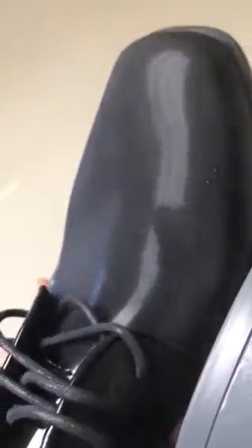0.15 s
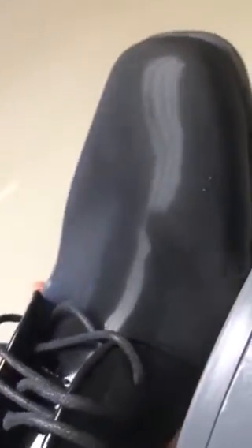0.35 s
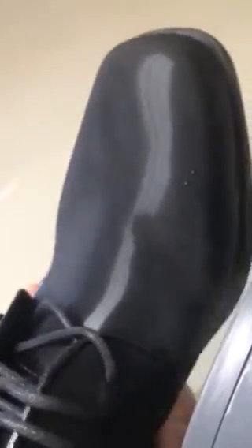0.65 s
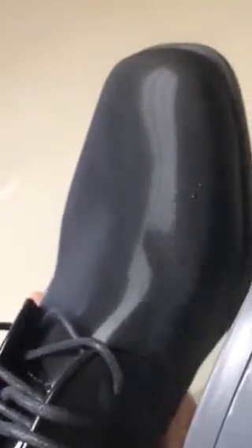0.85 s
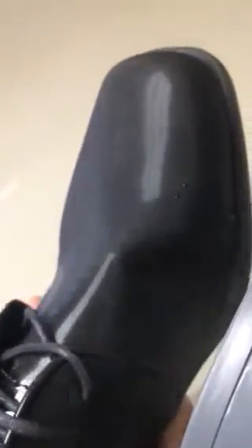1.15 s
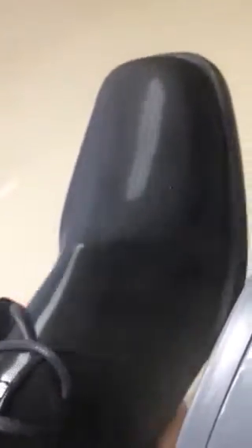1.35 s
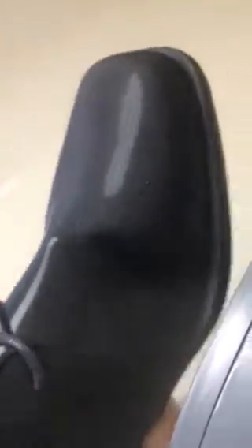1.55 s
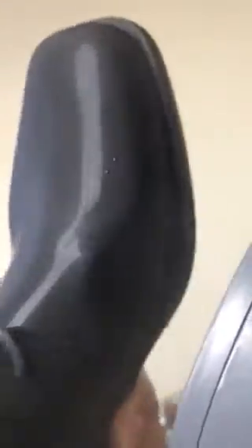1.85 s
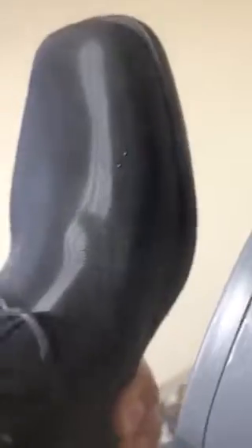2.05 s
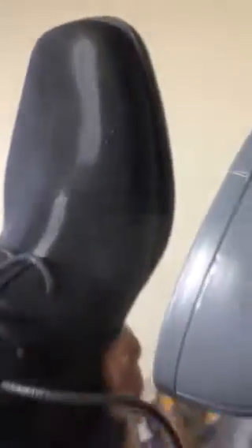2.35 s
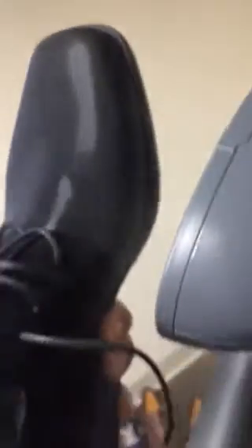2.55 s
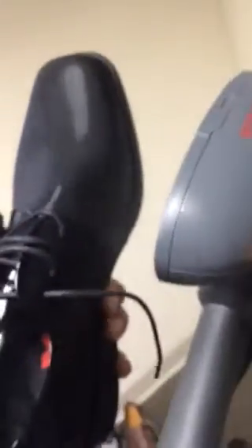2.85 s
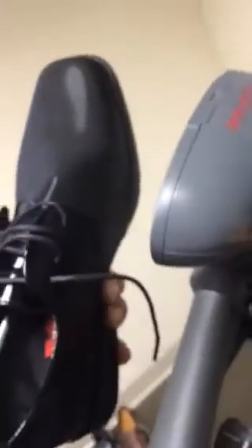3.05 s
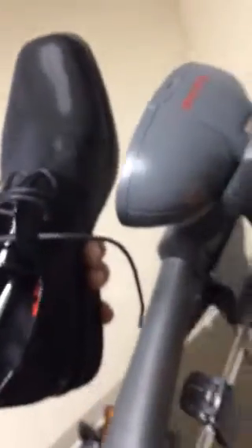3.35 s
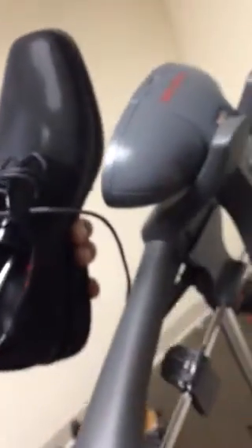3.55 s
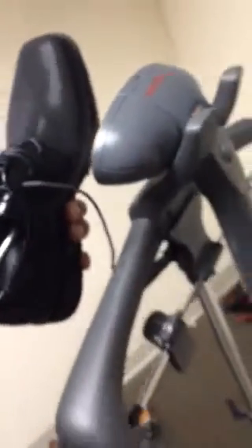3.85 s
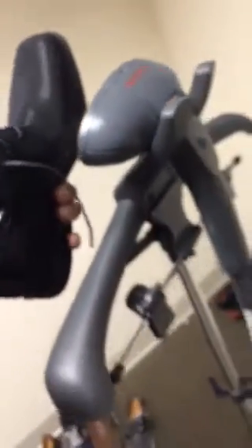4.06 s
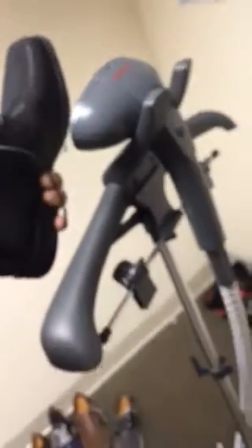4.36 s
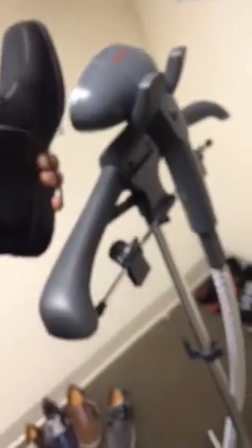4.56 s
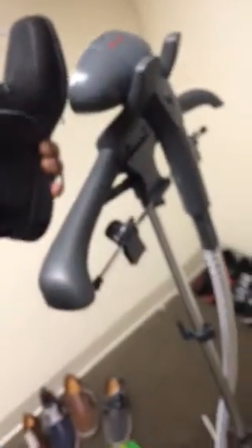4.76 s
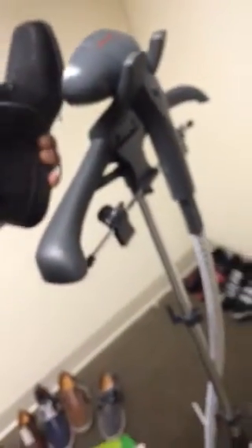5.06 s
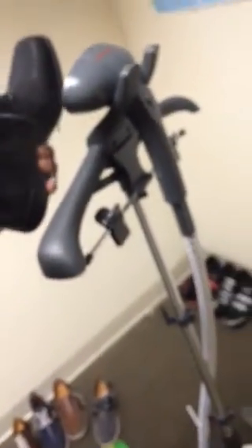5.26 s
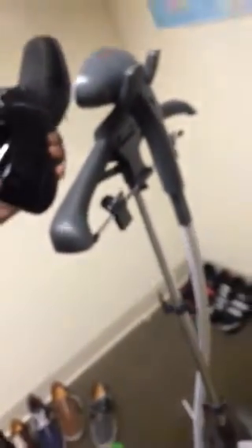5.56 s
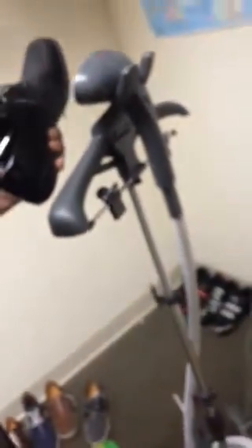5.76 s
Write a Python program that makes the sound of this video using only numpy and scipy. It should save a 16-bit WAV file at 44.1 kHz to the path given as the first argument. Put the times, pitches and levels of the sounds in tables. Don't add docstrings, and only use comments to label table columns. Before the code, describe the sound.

Close up, a garment steamer blows a continuous, bright, breathy hiss at a shoe, with frequent short hollow water spits. From about two seconds the phone microphone backs away; the hiss changes colour and weakens, the spits grow rare, and the flow surges briefly three times. A wet hose gurgles softly and a faint low motor drone sits beneath, in a carpeted room.

```python
import sys
import numpy as np
from scipy import signal
from scipy.fft import rfft, irfft
from scipy.io import wavfile
from scipy.ndimage import uniform_filter1d, map_coordinates

SR = 44100
rng = np.random.default_rng(int(sys.argv[2]) if len(sys.argv) > 2 else 0)


def store_pcm(level_fs):
    pcm = np.round(np.clip(level_fs, -1, 1) * 32767).astype(np.int16)
    wavfile.write(sys.argv[1], SR, np.atleast_2d(pcm).T)


def boost_factor(decibels):
    exponent = np.asarray(decibels, float) / 20
    return 10 ** exponent


N = 261072
T = np.arange(N) / SR
FRAME = 512


def unit(x):
    return x / np.sqrt(np.mean(x ** 2) + 1e-20)


def along(points, hz):
    f, v = np.transpose(points)
    return np.interp(np.log(hz + 1), np.log(f + 1), v)


def curves(rows, t):
    s, *cols = np.transpose(rows)
    return [np.interp(t, s, c) for c in cols]


def wobble(rate):
    coarse = T[::32]
    knots = rng.standard_normal(int(N * rate / SR) + 4)
    return np.interp(T, coarse, map_coordinates(knots, [coarse * rate]))


def peak(hz, centre_hz, width_hz):
    return 1 / np.sqrt(1 + (2 * (hz - centre_hz) / width_hz) ** 2)


def smoothed(cells, bands, frames):
    return uniform_filter1d(uniform_filter1d(cells, size=bands, axis=0), size=frames, axis=1)


def rush(colour, patchy_db):
    hz, t, z = signal.stft(rng.standard_normal(N), SR, nperseg=FRAME)
    gain = colour(hz[:, None], t) + 0 * t
    gain = gain / np.sqrt(np.mean(gain ** 2, axis=0))
    patches = unit(smoothed(rng.standard_normal(z.shape), bands=5, frames=24))
    z = z * gain * boost_factor(patchy_db * patches)
    return unit(signal.istft(z, SR, nperseg=FRAME)[1][:N])


# time in seconds, loss with distance in dB (positive is nearer), facing the holes in dB.
PHONE = [(0, 1, -4), (.2, 0, -2.5), (.56, 1, 2.5), (.94, -.5, 2), (1.3, 0.5, 0.5), (1.65, 0, 3),
         (1.83, -1, -0.5), (2.05, 1, -2.5), (2.26, -.5, -2.5), (2.5, -1, -1.5), (2.8, -3.5, 3.5),
         (3.3, -5, 4), (3.7, -5, 0.5), (3.82, -4, -6), (4.1, -5.5, -3), (4.72, -7, 0.5), (5.25, -10, -3.5),
         (5.92, -11, -3.5)]
# time in seconds, tightness of the gap in dB, jet let past in dB, echo notch in Hz, notch depth 0-1.
SHOE = [(0, 0.5, 1, 4900, 0.6), (.45, 0, 0, 4860, 0.63), (1, -.5, 0.5, 4600, 0.6), (1.4, -1, 3, 4150, 0.46),
        (1.85, -1, 3, 4220, 0.67), (2.15, -2, 3, 4550, 0.46), (2.45, -3.5, 4.5, 4250, 0.6),
        (2.9, -9.5, 3, 3700, 0.05), (3.2, -6.5, 2.5, 4200, 0.14), (3.4, -3.5, 3.5, 4900, 0.67),
        (3.75, -2.5, 2, 5100, 0.62), (4.1, -4, 0.5, 5060, 0.4), (4.6, -7.5, 0.5, 4860, 0),
        (5.2, -5.5, 2.5, 5000, 0.14), (5.55, -1.5, 1.5, 4970, 0.2), (5.92, -5, 3, 5150, 0.05)]


def steam():
    loss_db, facing_db = curves(PHONE, T)
    closed_db, passed_db, _, _ = curves(SHOE, T)
    flutter = wobble(14)
    head_db = -40 + surge_db() + 0.14 * flutter + 1.04 * wobble(90)
    gap_db = -39 + closed_db + 0.28 * flutter
    jet_db = -42 + passed_db + 0.27 * flutter
    holes_db = -42 + facing_db + 0.9 * wobble(6.2)
    flow = boost_factor(head_db) * rush(head, patchy_db=0.74)
    flow += boost_factor(gap_db) * rush(gap, patchy_db=0.37)
    flow += boost_factor(jet_db) * rush(jet, patchy_db=1.5)
    flow += boost_factor(holes_db) * rush(holes, patchy_db=2.2)
    return boost_factor(loss_db) * flow


# time in seconds, centre in Hz, width in Hz, gain over the broad hump in dB.
MODE = [
    (0, 1560, 407, 0),
    (1.4, 1510, 437, 12),
    (2.1, 1510, 450, -9),
    (2.6, 1400, 462, -4),
    (3.3, 1350, 500, -1),
    (3.8, 1460, 404, 14),
    (4.2, 1750, 200, -1.5),
    (5.1, 1870, 150, 3.5),
    (5.4, 1900, 300, -15),
]


def head(hz, t):
    mode_hz, width_hz, gain_db = curves(MODE, t)
    return boost_factor(gain_db) * peak(hz, mode_hz, width_hz) ** 2 + peak(hz, 1476, 2090) ** 4


def shifted(centre_hz, follows, t):
    return centre_hz + follows * (curves(SHOE, t)[2] - 5000)


# frequency in Hz for an upper edge at 4 kHz, level in dB per Hz.
GAP = [(1500, -17.5), (2000, -2), (2600, -1.5), (3000, -1), (3500, 0.5), (3900, -1.5), (4100, -9),
       (4550, -9.5), (4680, -30)]


def gap(hz, t):
    edge_hz = shifted(4050, 0.19, t)
    overtone = 0.48 * (t > 4.1) * (t < 5.3) * peak(hz, 3600, 140) ** 2
    ridge = 0.5 * np.clip(1 - t / 1.1, 0, 1) * peak(hz, 3600, 600) ** 2
    return boost_factor(along(GAP, hz * 4000 / edge_hz)) * (1 + overtone + ridge)


# frequency in Hz, level in dB per Hz.
JET = [(2500, -28), (4200, -2), (6000, -6), (9000, -5), (12000, -8.5), (12900, -6), (14000, -2.5),
       (15300, -7.5)]


def jet(hz, t):
    shown = np.interp(t, [0, 3.1, 3.4, 4, 4.4, 5.92], [0.1, 0.36, 2.1, 1.8, 0.55, 1.2])
    return boost_factor(along(JET, hz)) * (1 + shown * peak(hz, shifted(7150, 0.9, t), 2100) ** 2)


def holes(hz, t):
    whistle = peak(hz, shifted(11150, 0.39, t), 1680) ** 2
    facing = np.interp(t, [1.1, 1.3, 1.75, 1.9, 2.25, 2.4, 2.55], [0.22, 0.94, 0.73, 0.0, 0.31, 0.97, 0.29])
    return whistle + facing * peak(hz, 12500, 600) ** 2


SURGES = [
    3.74,
    4.98,
    5.46,
]


def surge_db():
    width_s = 0.06
    return 3.5 * sum(np.exp(-((T - s) / width_s) ** 2) for s in SURGES)


def blip(hz, cycles):
    turns = np.arange(SR // 25) / SR * hz
    return np.sin(2 * np.pi * turns) * boost_factor(-60 * (turns - 1 / 4) / max(cycles, 1))


# crest in seconds, crest in dB, ring in Hz, cycles of ring to -60 dB.
SPITS = [(0.0577, -26.5, 1210, 9), (0.2295, -19.5, 1300, 7), (0.3484, -27, 1000, 10),
         (0.4123, -25.5, 1220, 2), (0.6128, -19, 1300, 8), (0.956, -29, 1250, 4), (1.1106, -23, 1100, 7),
         (1.2316, -21, 1300, 4), (1.273, -27, 1160, 12), (1.4447, -25.5, 1050, 13),
         (1.5351, -22.5, 1100, 12), (1.6655, -28, 885, 3), (1.9875, -27, 1000, 5), (1.9985, -27, 1000, 5),
         (2.0237, -25, 1160, 3), (2.232, -22, 1170, 9), (2.535, -21, 1120, 8), (2.6118, -24.5, 780, 6),
         (2.652, -28.5, 1140, 20), (2.9098, -28, 1170, 5), (3.0635, -31, 1050, 5), (3.1032, -30, 1000, 12),
         (3.704, -30, 1220, 4), (0.9978, -27, 1100, 8), (4.553, -39, 710, 2), (3.8968, -30, 1100, 5),
         (3.9885, -32, 970, 9), (4.835, -36, 1220, 3), (5.4686, -36, 935, 10), (5.6756, -38, 1000, 8)]
# crest in seconds, crest in dB,
# ring in Hz, cycles of ring to -60 dB.
GULPS = [
    (.421, -38, 200, 8),
    (0.719, -40, 190, 12),
    (1.982, -41, 200, 4),
    (2.228, -48, 205, 13),
    (3.8785, -36, 550, 1),
    (5.06, -40, 800, 8),
]


def spitting():
    out = np.zeros(N + SR)
    for s, db, hz, cycles in SPITS + GULPS:
        slug = blip(hz, cycles)
        out[round((s - 1 / 4 / hz) * SR):][:len(slug)] += boost_factor(db + 0.3) * slug
    return out[:N]


# frequency in Hz, level in dB per Hz.
GURGLE = [(30, -10), (80, -15), (200, -14.5), (255, -3), (330, -8.5), (500, -1), (800, -4.5), (1100, 6.5),
          (1800, -19)]


def hose():
    patter = np.zeros(N + SR)
    for at, size, tone in rng.random((700, 3)):
        slug = blip(550 * 2.5 ** tone, cycles=6.8)
        patter[int(at * N):][:len(slug)] += boost_factor(-3 * np.log(size + 0.02)) * slug
    rumble = boost_factor(3.1 * wobble(30)) * rush(lambda hz, t: boost_factor(along(GURGLE, hz)), patchy_db=2.0)
    swell_s = 0.15
    wet = np.tanh(sum(np.exp(-((T - s) / swell_s) ** 2) for s, *_ in SPITS) / 2)
    fade_db = 1.12 * curves(PHONE, T)[0]
    level_db = -51.5 + fade_db + 4 * wet + surge_db()
    return boost_factor(level_db) * (unit(rumble) + boost_factor(-5) * unit(patter[:N]))


def walls(x):
    echoes = 0
    for place, sign, drift in rng.random((6, 3)):
        delay_s = 0.002 + 0.014 * place + 0.000128 * (drift - 0.7) * T + 0.00006 * wobble(1.237)
        echoes = echoes + np.sign(sign - 0.5) * map_coordinates(x, [(T - delay_s) * SR], mode="wrap")
    share = boost_factor(-20.5 - 0.68 * curves(PHONE, T)[0])
    return (x + share * echoes) / np.sqrt(1 + 6 * share ** 2)


# time in seconds, notch in Hz, width in Hz, depth 0-1.
HAND = [
    (0, 2360, 200, 0.3),
    (2.3, 2380, 200, 0),
    (3, 2660, 700, 0.34),
    (4.1, 2300, 500, 0.8),
    (4.7, 2830, 600, 0.26),
    (5.5, 2700, 400, .05),
]
# time in seconds, notch in Hz.
TREBLE_NOTCH = [(0, 13400), (.5, 12800), (.9, 12300), (1.65, 13900), (2.15, 11700), (2.3, 13800), (2.9, 12800),
                (3.65, 12900), (4, 13800), (4.25, 14900), (4.5, 13200), (5.92, 13700)]


def cancelled(x):
    hz, t, z = signal.stft(x, SR, nperseg=4 * FRAME)
    *_, shoe_hz, shoe_depth = curves(SHOE, t)
    hand = curves(HAND, t)
    shoe = shoe_hz, 0.21 * shoe_hz, shoe_depth
    deepening = np.clip(0.5 + t / 2 / 0.4, 0, 1)
    treble_notch = curves(TREBLE_NOTCH, t)[0], 1200, 0.72 * deepening
    bounce_depth = 0.17 - 0.073 * curves(PHONE, t)[0]
    carpet = 623, 41, bounce_depth
    table = 1108, 31, bounce_depth
    echoes = [hand, shoe, treble_notch, carpet, table]
    for (centre_hz, width_hz, depth), shake in zip(echoes, [0.62, 0.0, 1, 0, 0.1]):
        centre_hz = centre_hz + shake ** 2 * 380 * np.interp(t, T, wobble(14))
        flicker = 0.1 * np.interp(t, T, wobble(14)) - 0.33
        depth = np.clip(depth + shake * flicker, 0, 0.8)
        z = z * (1 - depth * peak(hz[:, None], centre_hz, width_hz) ** 2)
    return signal.istft(z, SR, nperseg=4 * FRAME)[1][:N]


# multiple of the shaft rate, level in dB.
MOTOR = [(1, -21), (2, -23), (3, -15), (4, -16), (5, -19), (6, -24), (7, -16), (8, -8), (9, .5), (10, 6),
         (11, -4), (12, 1), (13, -2), (14, -3), (15, -4), (16, -20)]


def motor():
    shaft_hz, first_beat_s = 15.01, 0.062
    turn = 2 * np.pi * shaft_hz * (T - first_beat_s) + 0.016 * wobble(1.36)
    drone = 0
    for k, db in MOTOR:
        spread = 0.07 * (k - 11) ** 2 + 0.7 * wobble(3)
        drone = drone + boost_factor(db + wobble(4)) * np.cos(k * turn + spread)
    return boost_factor(-60.5) * unit(drone)


# frequency in Hz, level in dB per Hz.
ROOM = [(25, -11), (60, -6), (130, 7), (200, 1), (260, -17), (600, -14), (3000, -27), (16000, -16)]


def room_air():
    return boost_factor(-62.5) * rush(lambda hz, t: boost_factor(along(ROOM, hz)), patchy_db=5.5)


def scene():
    mono = cancelled(walls(steam()) + hose()) + spitting() + motor() + room_air()
    return np.array([mono, mono])


def starved(x, from_hz, under_db):
    hz, t, z = signal.stft(x, SR, nperseg=4 * FRAME)
    power = smoothed(np.abs(z) ** 2, bands=5, frames=2)
    around = uniform_filter1d(power, size=70, axis=0)
    margin_db = under_db - 12 * np.clip(1 - hz[:, None] / from_hz, 0, 1) ** 0.5
    return signal.istft(z * (power > around * boost_factor(2 * margin_db)), SR, nperseg=4 * FRAME)[1][:N]


# middle in seconds, band centre in Hz.
REFILLS = [(0.159, 5200), (0.159, 9600), (0.879, 9600), (0.922, 5200), (0.972, 10500), (1.019, 12050),
           (1.022, 5500), (1.644, 8960), (2.67, 10330), (3.342, 9000), (4.175, 4950), (4.41, 13740),
           (4.526, 8960), (4.576, 6930), (5.016, 5800), (5.296, 10330), (5.707, 5450), (5.708, 11020)]


def refills(x):
    side, size = np.zeros(N), 4 * FRAME
    hz = np.fft.rfftfreq(size, 1 / SR)
    for s, centre_hz in REFILLS:
        start = round(s * SR) - size // 2
        band = abs(hz - centre_hz) < 1500 / 2
        level = np.std(irfft(rfft(x[start:][:size]) * band, size))
        block = unit(irfft(rfft(rng.standard_normal(size)) * band, size))
        side[start:][:size] += boost_factor(-4) * level * block * np.sin(np.pi * np.arange(size) / size)
    return np.array([side, -side])


def top_cut(x):
    return signal.sosfilt(signal.butter(12, 16480, fs=SR, output="sos"), x)


def record(dry):
    hz = np.fft.rfftfreq(N, 1 / SR)
    bass = (1j * hz / (51 + 1j * hz)) ** 2
    top = boost_factor(-0.5 * np.clip(hz - 15280, 0, None))
    mono = starved(dry[0], from_hz=12600, under_db=-3.6)
    mix = irfft(rfft(mono) * bass * top, N) + refills(mono)
    return top_cut(mix)


dry = scene()
out = record(dry)
store_pcm(out)
```